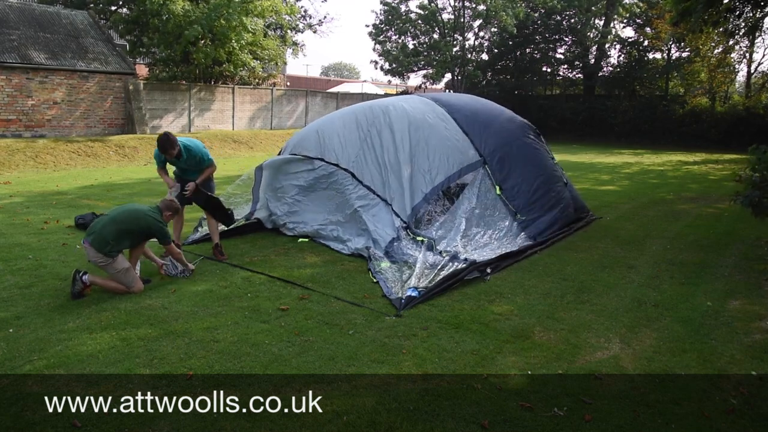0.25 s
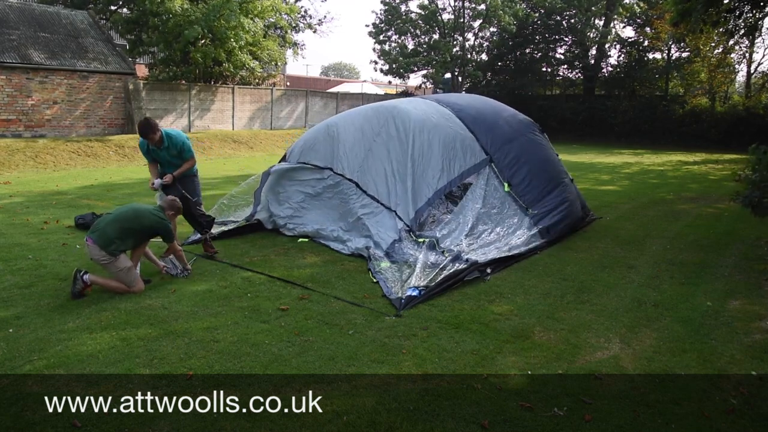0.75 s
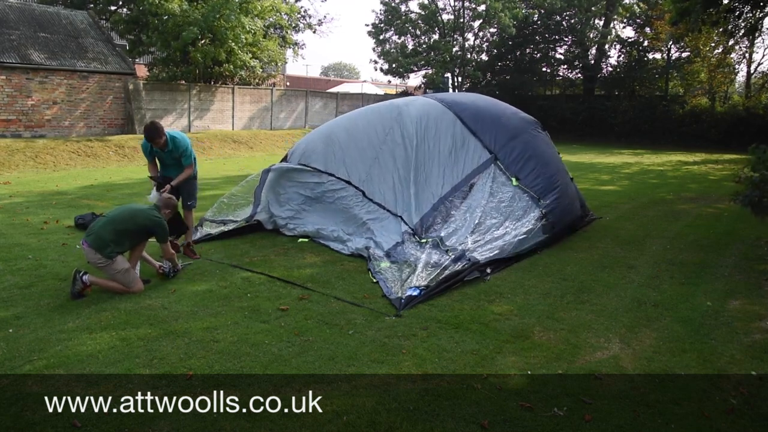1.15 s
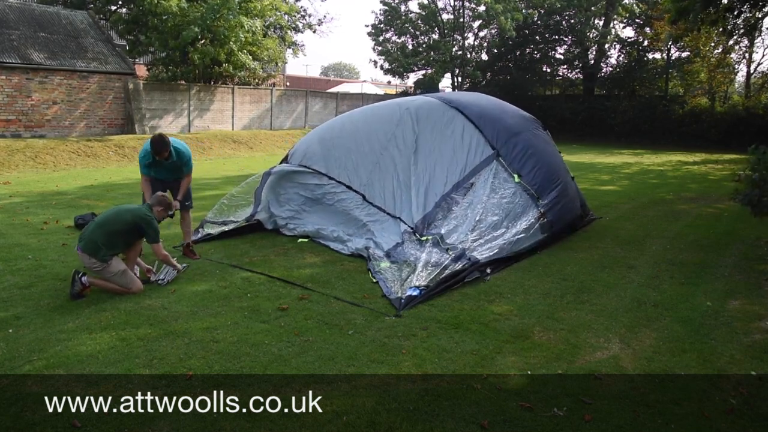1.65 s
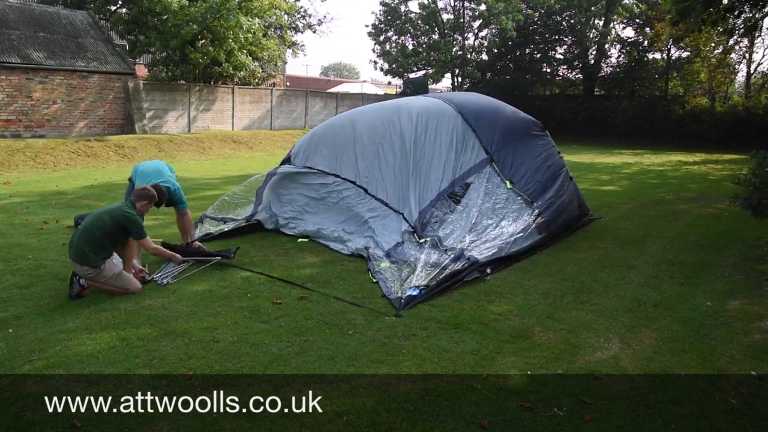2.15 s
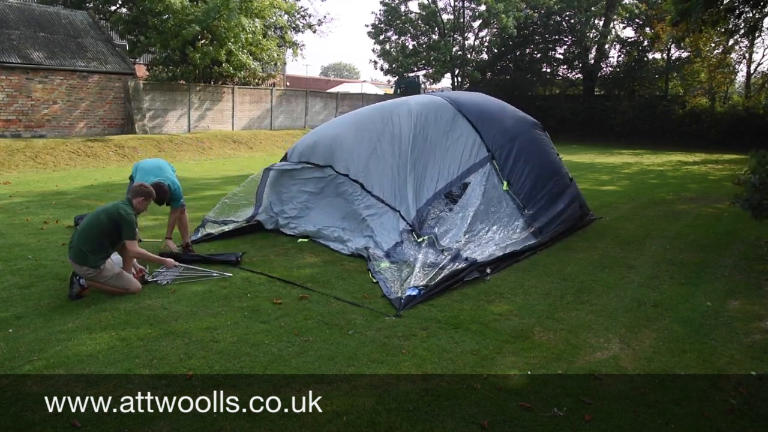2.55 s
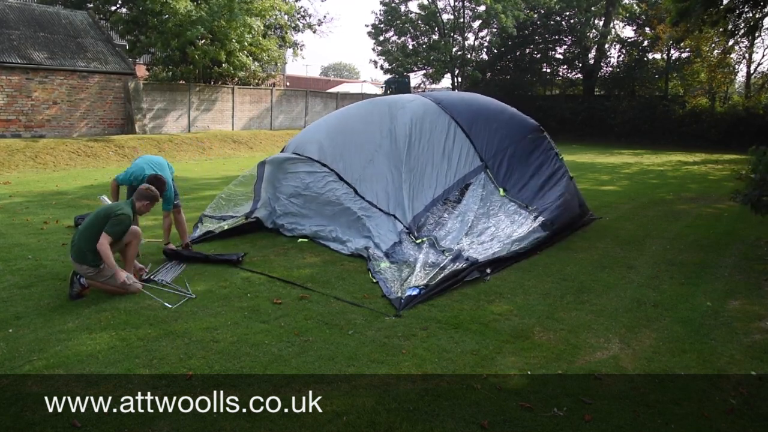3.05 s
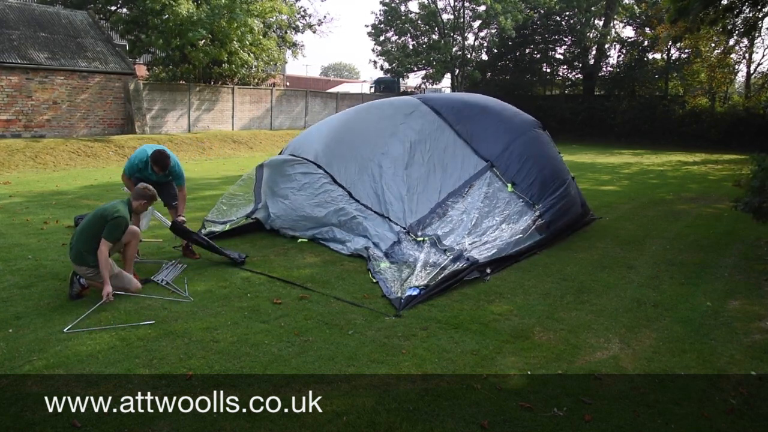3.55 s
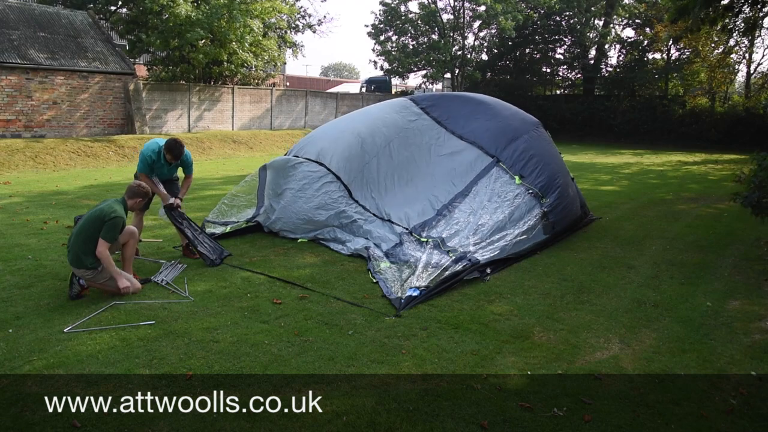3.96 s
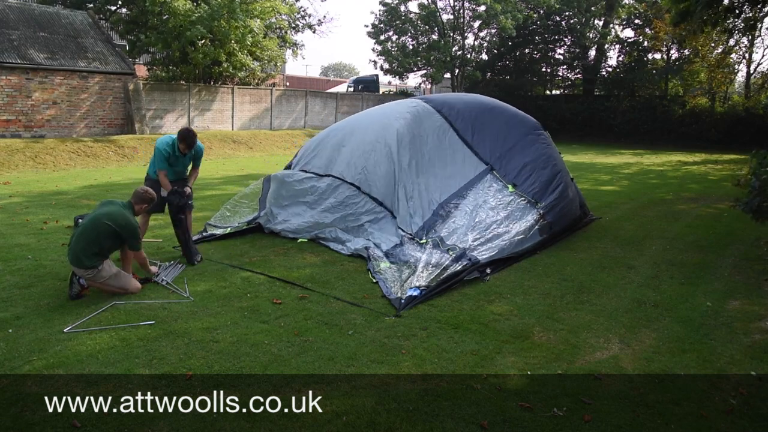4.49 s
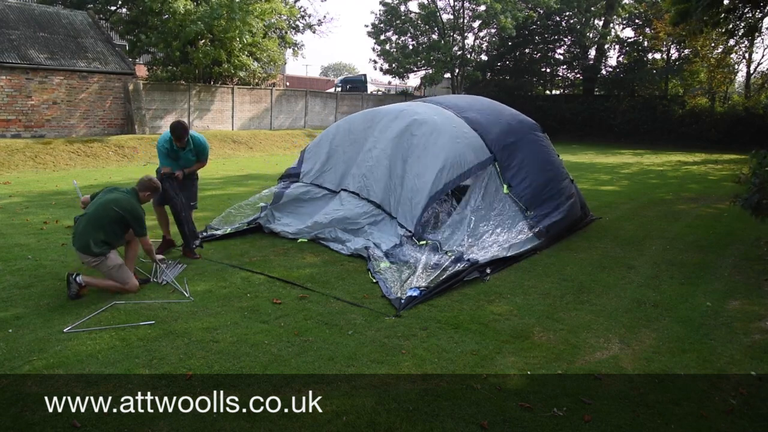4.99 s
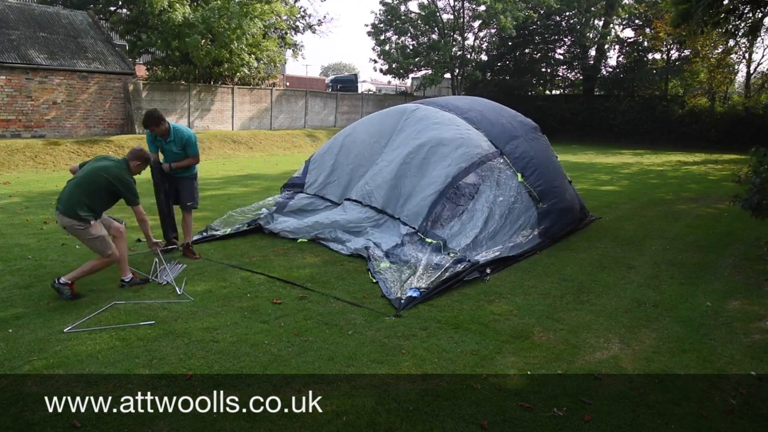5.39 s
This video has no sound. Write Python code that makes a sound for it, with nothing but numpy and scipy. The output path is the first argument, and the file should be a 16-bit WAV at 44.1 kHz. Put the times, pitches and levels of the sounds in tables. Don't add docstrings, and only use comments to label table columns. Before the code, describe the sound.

A mono outdoor take of thin metal tent poles and a nylon bag on grass. Small metallic tinks and scraping lead to one hard, bright clack at about 0.1 s, by far the loudest event, its rattle dying within a fraction of a second. From 0.5 to 1.8 s softer knocks and tumbles mix with dull bag bumps, crackling folds and crumpling, with a firmer clack near 0.95 s. Clinks stand out at 1.94 s, briefly ringing around 2.4 to 2.5 s, with sharp knocks at 2.65 and 2.82 s. From 3 to 3.7 s it is sparse, with faint ticks and a short low gust near 3.3 s. From 4 to 4.7 s the bag rustles and scrapes while a loose section jingles with short, high, uneven rings. A knock at 5.07 s and a bright cluster from 5.42 s close it. A faint garden hum stays underneath.

```python
import sys
import numpy as np
from scipy import signal
from scipy.fft import rfft, irfft, next_fast_len
from scipy.io import wavfile
from scipy.ndimage import uniform_filter1d, map_coordinates

SR = 44100
rng = np.random.default_rng(int(sys.argv[2]) if len(sys.argv) > 2 else 0)


def unload_audio(sound):
    columns = np.transpose(np.atleast_2d(sound))
    steps = np.round(np.clip(columns, -1, 1) * 32767)
    wavfile.write(sys.argv[1], SR, steps.astype(np.int16))


def undo_db(level):
    steps = np.asarray(level, float) / 20
    return 10 ** steps


N = 248283
SPAN, LEAD = 8192, 1024


def unit(x):
    return x / np.sqrt(np.mean(x ** 2) + 1e-20)


def along(points, hz):
    f, value = np.transpose(points)
    return np.interp(np.log(hz + 1), np.log(f + 1), value)


def curves(rows):
    s, *columns = np.transpose(rows)
    return [np.interp(np.arange(N) / SR, s, column) for column in columns]


def wobble(rate):
    knots = rng.standard_normal(int(N * rate / SR) + 4)
    return map_coordinates(knots, [np.arange(N) * rate / SR])


def place(times, sounds):
    at = np.round(times * SR).astype(int)[:, None] + np.arange(sounds.shape[1])
    return np.bincount(at.ravel(), sounds.ravel(), N + SPAN)[:N]


def coloured(x, spectrum):
    m = next_fast_len(N + SPAN)
    gain = undo_db(along(spectrum, np.fft.rfftfreq(m, 1 / SR)))
    return unit(irfft(rfft(x, m) * gain, m)[:N])


def rustle(spectrum, patchy_db, grain_db, rate):
    grains = rng.standard_normal(N) * undo_db(grain_db * wobble(rate))
    z = signal.stft(grains, nperseg=256)[2]
    field = uniform_filter1d(rng.standard_normal(z.shape), size=5, axis=0)
    field = unit(uniform_filter1d(field, size=9, axis=1))
    patchy = signal.istft(z * undo_db(patchy_db * field), nperseg=256)[1][:N]
    return coloured(patchy, spectrum)


def resonance(f, centre, width):
    return 1j * f * width / (centre * centre - f * f + 1j * f * width)


def puffs(s, peak_db, hz, t60, sharp):
    t, f = np.arange(SPAN // 2) / SR, np.fft.rfftfreq(SPAN // 2, 1 / SR)
    puff = rng.standard_normal((len(s), len(t))) * undo_db(-60 * t / np.clip(t60, .002, .16))
    sound = irfft(rfft(puff) * resonance(f, hz, hz / sharp) ** 2)
    return place(s[:, 0], sound * undo_db(peak_db) / np.abs(sound).max(axis=1, keepdims=True))


def clacks():
    # pitch_hz [Hz], width_hz [Hz], level_db [dB]
    bundle = [(1890, 34, -39.5), (4260, 36, -3.5), (5400, 16, -5.5), (6430, 66, -7), (7490, 376, -5),
              (8100, 52, -11), (9100, 74, -19.5), (10550, 41, -9.5), (9590, 140, -6), (12800, 83, -22)]
    # pitch_hz [Hz], level_db [dB per Hz]
    crack = [(350, -59), (600, -6), (1750, 0), (2070, 1.5), (2240, 3), (4460, 8.5), (14100, -2.5),
             (16000, -15.5)]
    s, peak_db, low_db, bright_db, t60, build = np.transpose(contacts())[:, :, None]
    t, f = (np.arange(SPAN) - LEAD) / SR, np.fft.rfftfreq(SPAN, 1 / SR)
    chatter = undo_db(2.5 * np.repeat(rng.standard_normal((len(s), SPAN // 64)), 64, axis=1))
    rise_db = 60 * t / np.clip(build, .001, .08)
    fall_db = -60 * t / np.clip(t60, .004, .15)
    shape = undo_db(np.where(t < 0, rise_db, fall_db))
    flurry = rng.standard_normal((len(s), SPAN)) * chatter * shape
    luck = rng.standard_normal((len(s), len(bundle), 2))
    body = np.full((len(s), len(f)), .4 + 0j)
    for k, (hz, width, db) in enumerate(bundle):
        centre = hz * (1 + luck[:, k, :1] / 100)
        gain = undo_db(db - along(crack, hz) + 2.2 * luck[:, k, 1:])
        body = body + gain * resonance(f, centre, width + 150)
    lowness, brightness = np.clip((3000 - f) / 1000, 0, 1), np.clip((f - 6000) / 2000, 0, 1)
    colour = undo_db(along(crack, f) + lowness * (low_db + 19.0) + brightness * (bright_db + 12))
    sound = irfft(rfft(flurry) * body * colour, SPAN)[:, :SPAN * 3 // 4]
    sound = sound * undo_db(peak_db) / np.abs(sound).max(axis=1, keepdims=True)
    return place(s[:, 0] - LEAD / SR, sound)


def contacts():
    # start_s [s], peak_db [dB], bright_db [dB], rattle_t60_s [s]
    bare = [(.0366, -22.5, -31, 0.017), (.1806, -34, -9, .023), (.2105, -29, -14.5, .04),
            (.2185, -27, -16, 0.065), (1.3662, -24, -18.5, 0.01), (1.6866, -27.5, -10, 0.012),
            (1.709, -29, -13, 0.02), (1.8891, -34, -24, 0.11), (1.9143, -29, -18.5, 0.068),
            (1.9408, -17, -12, 0.055), (1.983, -34, -18, 0.022), (2.0579, -27.5, -7.5, 0.034),
            (2.181, -36, -19, 0.056), (2.3186, -36, -23.5, 0.022), (2.38, -27, -8, 0.014),
            (2.5537, -28, -13.5, .019), (2.701, -33.5, -15, .021), (2.778, -32, -26, 0.04),
            (2.82, -15.5, -12.5, 0.0384), (2.9525, -39, -19, 0.031), (3.042, -41.5, -26, 0.18),
            (3.183, -33.5, -22, 0.036), (4.159, -22, -14.5, 0.02), (4.5395, -36, -3, 0.027),
            (4.939, -29.5, -9.5, 0.047), (5.4193, -15.5, -9.5, 0.022), (5.429, -23, -9, 0.035),
            (5.458, -21, -17, 0.033), (5.5747, -30.5, -24, 0.022), (5.5876, -28, -21, 0.019),
            (5.615, -24.5, -22, 0.033)]
    # start_s [s], peak_db [dB], bright_db [dB], rattle_t60_s [s]
    held = [(.1138, 0.5, -13, 0.033), (.1176, -7.5, -11, 0.074), (.125, -6.5, -11, 0.076),
            (.137, -9, -14, 0.069), (.148, -17.5, -13, 0.047), (.264, -26, -14, 0.078),
            (.2917, -29.5, -10, 0.012), (.5555, -35, -13, 0.27), (.702, -33, -22, 0.19),
            (.9175, -25, -19, 0.096), (1.7603, -34, -22, 0.1), (2.1237, -31, -22, 0.021),
            (2.4139, -26, -10, 0.036), (2.4378, -32, -15, 0.027), (2.4843, -34, -13, 0.078),
            (2.613, -33, -25, 0.071), (3.1105, -31.5, -23.5, 0.059), (3.3828, -38, -24, 0.015),
            (3.7582, -36, -34, 0.027), (3.7935, -24, -16, 0.022), (3.803, -26.5, -19, 0.051),
            (4.0145, -25, -10.5, 0.049), (4.328, -29, -22, 0.03), (4.583, -24.5, -4, 0.054),
            (4.6758, -36, 2, .035), (4.9035, -29, -20, 0.016), (5.0711, -20.5, -8, 0.018),
            (5.212, -28, -15, 0.0076), (5.5087, -31, -25, 0.057)]
    # start_s [s], peak_db [dB], bright_db [dB], rattle_t60_s [s]
    muffled = [(.3197, -39, -18.5, 0.12), (.7667, -33, -23, 0.14), (1.0183, -31, -16, 0.011),
               (1.0388, -38, -29, 0.11), (1.1105, -32, -21, 0.018), (1.2029, -33, -17, 0.056),
               (1.424, -30, -31, 0.019), (1.4815, -34, -30, 0.071), (1.6494, -28.5, -17, 0.026),
               (2.1097, -35, -24, 0.021), (2.2882, -36.5, -18, 0.048), (2.7528, -34.5, -17.5, 0.034),
               (3.0777, -32.5, -11, 0.013), (3.405, -35, -17, 0.017), (3.467, -38, -19, 0.024),
               (3.6032, -39.5, -10, 0.019), (3.9963, -31, -17, 0.062), (4.0338, -29, -13, 0.072),
               (4.0674, -37, -22, 0.015), (4.4917, -28.5, -3, 0.021), (5.2909, -32, -22, 0.018)]
    # start_s [s], peak_db [dB], low_db [dB], rattle_t60_s [s], build_s [s]
    tumbles = [(0.1108, 2, -21.5, 0.044, 0.017), (0.2422, -25, -15, 0.022, 0.097),
               (.6175, -27, -11.5, 0.08, 0.016), (.896, -26.5, -11, 0.057, 0.034),
               (0.9516, -16.5, -23, 0.07, 0.014), (1.069, -25, -0.5, 0.21, 0.022),
               (1.142, -24, -14, 0.04, 0.05), (1.2519, -21, 4, .03, 0.004), (1.4371, -28, 7, .056, .035),
               (1.5827, -31, -4, 0.21, 0.0055), (1.6298, -26, -1, .037, 0.016),
               (2.0771, -33.5, -8, 0.17, 0.022), (2.6518, -19.5, -18.5, .03, 0.047),
               (2.6668, -24.5, -16.5, 0.019, 0.053), (2.8642, -33.5, -17, .067, 0.036),
               (3.0895, -40, -11, 0.16, 0.048), (3.245, -35, -16, 0.1, 0.078),
               (4.2632, -25, -12, 0.041, 0.04), (4.4163, -29, -8, .042, 0.063),
               (4.4309, -31, -10.5, .15, 0.024), (4.5983, -28.5, -30.5, 0.19, 0.045),
               (5.3495, -34, -8, 0.072, 0.059), (5.444, -24, -19.5, 0.035, 0.053)]
    build_s = 0.003
    everything = []
    for rows, low_db in [(bare, -29.5), (held, -20), (muffled, -4)]:
        everything += [(s, db, low_db, bright_db, t60, build_s) for s, db, bright_db, t60 in rows]
    everything.sort()
    for s, db, low_db, t60, build in tumbles:
        bright_db = -11.5 + 0.25 * db
        everything.append((s, db, low_db, bright_db, t60, build))
    return everything


def rings():
    # start_s [s], third_mode_peak_db [dB], then second_db, fourth_db, top_db against it [dB]
    strikes = [(2.415, -27.5, -5, -13, -4), (2.438, -25.5, -20, -22, -10.5),
               (2.4572, -36.5, -14, -30, -4.5), (2.486, -25, -34, -1.5, -5), (2.5215, -35.5, -5, -17, -3.5),
               (3.7944, -35.5, 10, -9, -8.5), (4.1585, -30.5, 0, -1, -30), (4.204, -36.5, 4, -1, -12),
               (4.297, -29.5, -4, -16, -26), (4.3287, -31.5, 11, -3, -9), (4.347, -28, 7.5, -1.5, -12.5),
               (4.376, -30.5, 4, -5, -12.5), (4.3974, -37.5, 12, -1, -9), (4.415, -28, 1.5, -17, -11.5),
               (4.426, -24, -12, 3.5, -14.5), (4.437, -29.5, -4, -3, -8), (4.487, -33, -11, -15, -15.5),
               (4.492, -29, -1.5, -1.5, -9), (4.5391, -31.5, -17, -2, -16.5), (4.58, -33.5, -3, 4, -14),
               (4.6042, -37.5, -24, -23, -1.5), (4.6718, -39, -3, 1, -10)]
    # pitch_hz [Hz], level_db [dB], t60_s [s]
    modes = [(1300, -12.5, 0.09), (2078, 0.5, 0.058), (2400, -4, 0.023), (2680, -6, 0.036),
             (3057, 3, 0.067), (4120, 2, 0.07), (5370, 5, 0.1), (6740, 1, 0.07), (6960, 3.5, 0.067),
             (7400, -12, 0.045), (8400, -4.5, 0.034), (9600, -12.5, 0.023), (11300, -24, 0.023),
             (13000, -14, .04)]
    free_s, grip = 4.28, 0.43
    groups = (4, 0, 4, 4, 4, 1, 3, 2, 2, 2, 2, 2, 2, 2)
    rows, t, f = np.array(strikes), np.arange(SPAN) / SR, np.fft.rfftfreq(SPAN, 1 / SR)
    fifth_db = -14.5 + .45 * rows[:, -2]
    balance = np.column_stack([rows[:, 2:], fifth_db, np.zeros(len(rows))])
    jostling = undo_db(-60 * t / 0.094) * (1 - np.exp(-t / 0.0039))
    strike = 2.14 * undo_db(-60 * t / 0.0062)
    push = rfft(rng.standard_normal((len(rows), SPAN)) * (jostling + strike))
    detune = 1 + rng.standard_normal((len(rows), len(modes))) / 300
    held_share = np.where(rows[:, :1] < free_s, grip, 1)
    sound = np.zeros((len(rows), SPAN))
    for k, ((hz, db, t60), group) in enumerate(zip(modes, groups)):
        width = np.log(1000) / (np.pi * t60 * held_share)
        mode = irfft(push * resonance(f, hz * detune[:, [k]], width), SPAN)
        mode = mode / np.abs(mode).max(axis=1, keepdims=True)
        sound = sound + undo_db(db + balance[:, [group]]) * mode
    return place(rows[:, 0], sound * undo_db(rows[:, [1]] - 4.0))


def tinks():
    # start_s [s], peak_db [dB], pitch_hz [Hz], t60_s [s]
    touches = [(.010, -32.5, 4100, 0.033), (0.037, -32, 6300, .04), (.037, -36, 8500, .04),
               (.048, -30, 4700, .04), (.058, -28, 7400, .06), (.072, -25, 7500, 0.055),
               (.073, -33, 10800, 0.046), (.080, -27, 6440, .05), (0.081, -34, 9500, 0.042),
               (.109, -3.5, 9350, 0.042), (0.111, -9, 4540, 0.076), (.117, -13, 4350, 0.072),
               (.211, -40, 9600, 0.035), (.212, -41, 11400, .04), (.219, -27.5, 4240, .07),
               (.228, -43, 11500, 0.066), (.264, -45, 9600, 0.032), (.265, -43, 11700, 0.027),
               (0.27, -33, 4200, .06), (0.329, -36.5, 4680, 0.05), (2.439, -27, 2320, 0.045),
               (2.462, -39, 2240, 0.11), (2.487, -30.5, 8400, 0.066), (2.612, -41, 4740, 0.018),
               (2.628, -38, 2090, 0.038), (2.649, -31, 4530, .04), (2.702, -38, 4460, 0.028),
               (3.032, -47, 4920, .08), (3.092, -36.5, 2800, 0.042), (3.112, -37, 5600, 0.025),
               (3.126, -40.5, 5040, 0.05), (3.248, -42, 6600, .04), (3.249, -40, 7500, 0.034),
               (3.250, -44, 4860, .04), (3.266, -46, 7500, 0.028), (3.382, -52, 4650, 0.028),
               (3.403, -45.5, 4000, .025), (3.428, -48, 3900, 0.016), (3.466, -42.5, 2150, 0.039),
               (3.794, -29, 3200, 0.035), (4.013, -25.5, 2795, 0.034), (4.015, -43, 4200, 0.035),
               (4.015, -33, 5300, 0.046), (4.540, -29, 3560, .05), (4.582, -25, 3590, 0.032),
               (4.622, -31.5, 3940, .02), (5.420, -28, 4400, 0.083)]
    # start_s [s], peak_db [dB], pitch_hz [Hz], t60_s [s]
    rubs = [(2.414, -33.5, 3085, .07), (2.45, -48, 5370, 0.16), (2.486, -44.5, 1300, 0.033),
            (2.821, -25, 5140, 0.019), (2.819, -28, 4310, 0.063), (2.824, -33.5, 6100, 0.046),
            (4.159, -28.5, 3090, 0.064), (4.158, -35, 5370, 0.089), (4.298, -39, 2480, .07),
            (4.358, -35, 6670, 0.14), (4.358, -38, 7210, 0.14), (4.40, -42, 7160, .15),
            (4.425, -32, 5294, 0.2), (4.495, -37, 5370, .07), (4.584, -41, 5370, 0.088),
            (4.595, -31.5, 6920, 0.11), (4.61, -38, 8170, 0.083), (4.621, -40, 6680, .12),
            (4.677, -42.5, 8260, 0.078)]
    # start_s [s], peak_db [dB], pitch_hz [Hz]
    ticks = [(.640, -38.5, 2500), (.788, -37.5, 4500), (.992, -36, 5500), (1.118, -36, 9500),
             (1.168, -37, 5970), (1.393, -36, 3730), (1.404, -35.5, 4200), (1.4373, -36, 6500),
             (1.52, -37, 4490), (1.5595, -39.5, 4460), (1.596, -31, 5300), (1.615, -32, 6200),
             (1.665, -33.5, 5970), (1.738, -38, 9000), (1.773, -33.5, 5500), (1.795, -38.5, 7010),
             (1.8727, -34, 4120), (2.590, -36, 4500), (2.694, -38, 3500), (3.805, -30, 4260),
             (3.438, -38, 2550)]
    ticking = puffs(*np.transpose(ticks)[:, :, None], t60=0.013, sharp=1.8)
    touching = puffs(*np.transpose(touches)[:, :, None], sharp=11)
    return ticking + touching + puffs(*np.transpose(rubs)[:, :, None], sharp=42)


def creases():
    # start_s [s], peak_db [dB], pitch_hz [Hz], t60_s [s]
    bumps = [(0.111, -28, 897, 0.07), (0.732, -30, 1200, 0.067), (0.947, -25.5, 1540, 0.18),
             (1.028, -29, 1290, 0.058), (1.068, -25, 1290, 0.11), (1.202, -29, 1150, 0.025),
             (1.247, -30, 1600, 0.032), (1.365, -30.5, 870, 0.083), (1.481, -33, 870, 0.061),
             (1.631, -31, 1440, 0.051), (2.107, -28, 854, 0.054), (2.242, -34.5, 660, 0.13),
             (2.483, -30, 1340, 0.078), (2.818, -30, 726, 0.11), (3.09, -31, 645, 0.06),
             (4.234, -31.5, 516, 0.14), (4.414, -24.5, 480, 0.19), (4.599, -27.5, 850, 0.15),
             (4.637, -31, 384, 0.07), (5.066, -27.5, 1280, 0.033)]
    # start_s [s], peak_db [dB], pitch_hz [Hz]
    folds = [(0.319, -25, 1720), (0.562, -35, 1510), (0.694, -31, 1180), (0.771, -32, 1140),
             (0.88, -37, 1320), (0.973, -28.5, 1400), (1.001, -33, 1870), (1.028, -32, 1260),
             (1.04, -28, 1320), (1.053, -31, 1060), (1.072, -24.5, 1220), (1.087, -25.5, 1350),
             (1.096, -32, 783), (1.11, -30.5, 476), (1.138, -32, 627), (1.148, -29, 1440),
             (1.194, -37, 815), (1.202, -27, 1180), (1.214, -35, 872), (1.229, -29, 861),
             (1.236, -27.5, 1870), (1.249, -35, 1660), (1.267, -37, 950), (1.283, -36, 918),
             (1.365, -27, 814), (1.38, -31, 824), (1.435, -37, 1050), (1.452, -31.5, 996),
             (1.486, -37.5, 603), (1.558, -43, 886), (1.586, -38, 1570), (1.611, -37, 1280),
             (1.63, -27.5, 716), (1.717, -39, 993), (1.761, -31.5, 899), (3.077, -38.5, 684),
             (3.088, -36, 640), (3.414, -38, 560), (4.033, -31, 1890), (4.641, -33.5, 401),
             (2.074, -39, 837), (2.134, -31, 1170), (2.243, -45.5, 613), (2.274, -34, 942),
               (2.291, -38, 630), (2.304, -39, 974), (2.346, -36, 595), (2.84, -33.5, 673)]
    s, peak_db, hz, t60 = np.transpose(bumps)[:, :, None]
    fold_s, fold_db, fold_hz = np.transpose(np.array(folds))[:, :, None]
    snap_s = fold_s + .0012
    return puffs(s, peak_db - 3.5, hz, t60, 1) + puffs(snap_s, fold_db + 0.5, fold_hz, .006, 1.1)


def handling():
    # time_s [s], share [0-1]
    clear = [
        (2.5, 0),
        (2.95, 0.97),
        (4.2, 1),
        (4.5, 0.03),
    ]
    jerk, pulled = wobble(30), np.clip(curves(clear)[0], 0, 1)
    return bag(jerk, pulled) + drag(jerk, pulled)


def bag(jerk, pulled):
    # time_s [s], effort_db [dB]
    effort = [(0, -52.5), (.5, -53.5), (.64, -48), (.9, -52), (1.15, -42), (1.44, -45.5), (1.72, -46),
              (1.9, -57), (2.12, -48.5), (2.5, -58.5), (3.6, -54.5), (4.01, -46), (4.42, -42), (4.82, -49),
              (5.05, -44.5), (5.25, -51.5), (5.63, -51.5)]
    # pitch_hz [Hz], level_db [dB per Hz]
    nylon = [(120, -21), (200, -0.5), (430, 1.5), (1670, -3.5), (3500, -30.5), (4550, -47), (7700, -120)]
    (effort_db,), slack = curves(effort), undo_db(-18 * pulled)
    crumple = undo_db(effort_db - 2.2 + 1.2 * jerk) * rustle(nylon, patchy_db=1.6, grain_db=3.5, rate=400)
    crisp = signal.sosfiltfilt(signal.butter(2, 1000, "highpass", fs=SR, output="sos"), crumple)
    snaps = slack * undo_db(effort_db - 6.0) * crackle(rate=240, spread_db=5.5)
    return crumple - (1 - slack) * crisp + snaps


def crackle(rate, spread_db):
    # pitch_hz [Hz], level_db [dB per Hz]
    fold_tone = [(250, -18), (700, -2), (1500, 0), (2800, -5), (5000, -16), (9000, -34), (16000, -60)]
    snaps = (rng.random(N) < rate / SR) * undo_db(spread_db * rng.uniform(-0.87, 1, N))
    bursts = np.convolve(snaps, np.hanning(24))[:N]
    return coloured(rng.standard_normal(N) * bursts, fold_tone)


def drag(jerk, pulled):
    # time_s [s], effort_db [dB], cloth_and_grass_db [dB]
    effort = [(0, -50, 0), (.06, -34, -10.5), (.2, -42, -10), (.515, -61.5, 2.5), (.57, -51.5, 1.5),
              (1.58, -55.5, -6), (1.72, -50, -7), (1.87, -59.5, -3), (2.39, -59, -5.5), (2.66, -51, -12),
              (2.8, -59.5, -7), (3.5, -62.5, -4), (4.01, -48, -5.5), (4.3, -44, 0), (4.75, -51, -3),
              (4.96, -44.5, -1.5), (5.3, -59.5, -4.5), (5.63, -49.5, -9.5)]
    # pitch_hz [Hz], level_db [dB per Hz]
    metal = [(1600, -29.5), (2200, 3), (3500, 8.5), (5000, 8), (6500, 2), (9000, -12.5)]
    # pitch_hz [Hz], level_db [dB per Hz]
    cloth = [(4000, -25.5), (6500, 7.5), (8000, 7), (12000, 1), (15000, -1), (16000, -8)]
    # pitch_hz [Hz], level_db [dB per Hz]
    tube = [(1700, -7.5), (2200, 5.5), (2900, 2), (3500, -31.5)]
    effort_db, cloth_db = curves(effort)
    scrape = undo_db(effort_db + jerk) * rustle(metal, patchy_db=3.0, grain_db=2.0, rate=460)
    swish = undo_db(effort_db + cloth_db + jerk) * rustle(cloth, patchy_db=3.5, grain_db=2.0, rate=110)
    hollow = undo_db(effort_db - 2.5 + jerk) * rustle(tube, patchy_db=-0.5, grain_db=3.5, rate=120)
    return scrape + swish + pulled * hollow


def breeze():
    # time_s [s], level_db [dB]
    gusts = [
        (0, -65),
        (1.15, -54.5),
        (2.4, -65),
        (3.15, -68.5),
        (3.3, -51),
        (3.5, -68),
        (4.3, -63.5),
        (4.9, -63),
        (5.63, -60),
    ]
    # pitch_hz [Hz], level_db [dB per Hz]
    flutter = [(30, -24.5), (70, -18.5), (140, 7.5), (250, 0), (450, -28)]
    return undo_db(curves(gusts)[0]) * rustle(flutter, patchy_db=-1.5, grain_db=1.0, rate=21)


def garden():
    # pitch_hz [Hz], level_db [dB per Hz]
    hum = [(120, -4), (200, 5), (450, -1), (900, 7.5), (1300, -2.5), (2400, -9.5), (3400, -33.5),
           (16000, -33.5)]
    return undo_db(-56.5) * rustle(hum, patchy_db=2, grain_db=1.5, rate=8)


def yard(poles):
    t = np.arange(SPAN) / SR
    scatter = rng.standard_normal(SPAN) * undo_db(-60 * t / .12) * (t > .004)
    return undo_db(-18) * signal.fftconvolve(poles, scatter / np.linalg.norm(scatter))[:N]


def scene():
    poles = clacks() + rings() + tinks()
    return (poles + yard(poles) + creases() + handling() + breeze() + garden())[None]


def low_pass(x):
    return signal.sosfilt(signal.butter(12, 15800, fs=SR, output="sos"), x)


def record(dry):
    clipped = dry / (1 + np.abs(dry / .92) ** 8) ** (1 / 8)
    bass_cut = signal.butter(3, 78, "highpass", fs=SR, output="sos")
    top_cut = signal.ellip(4, .5, 22, 15800, fs=SR, output="sos")
    return low_pass(signal.sosfilt(np.vstack([bass_cut, top_cut]), clipped))


dry = scene()
out = record(dry)
unload_audio(out)
```